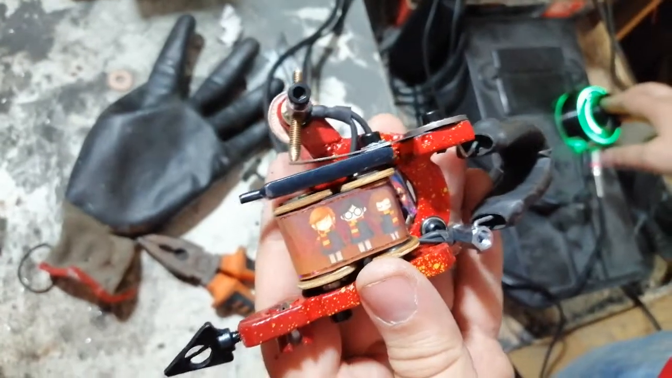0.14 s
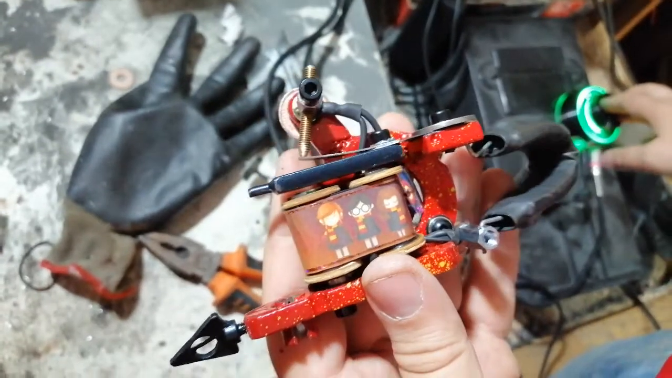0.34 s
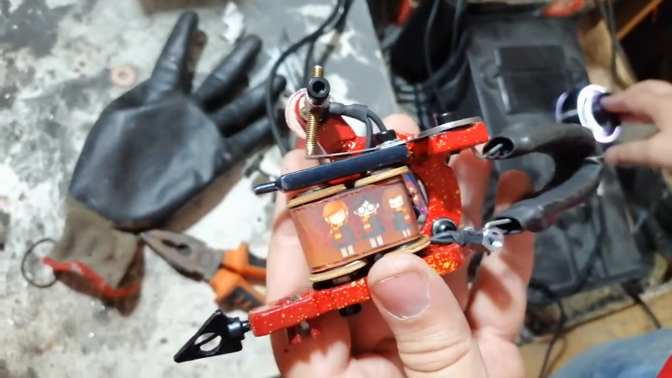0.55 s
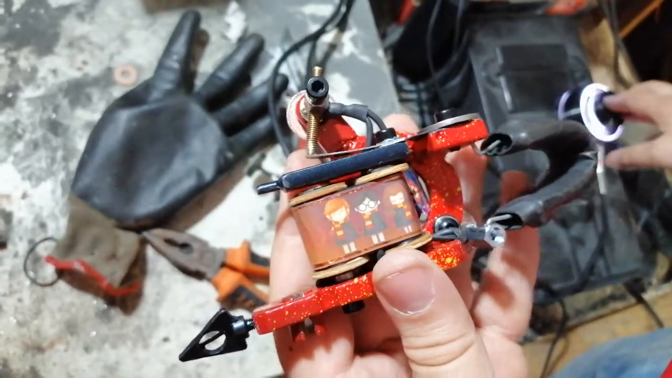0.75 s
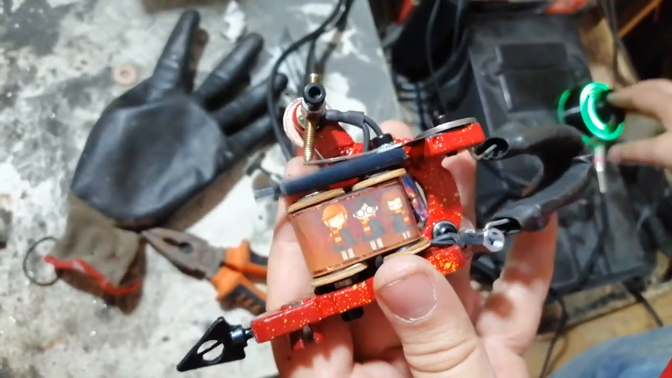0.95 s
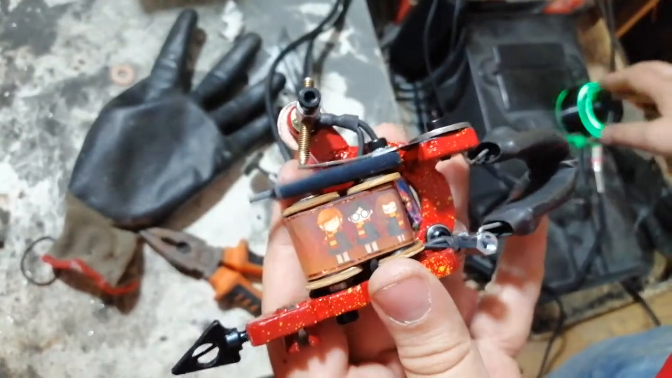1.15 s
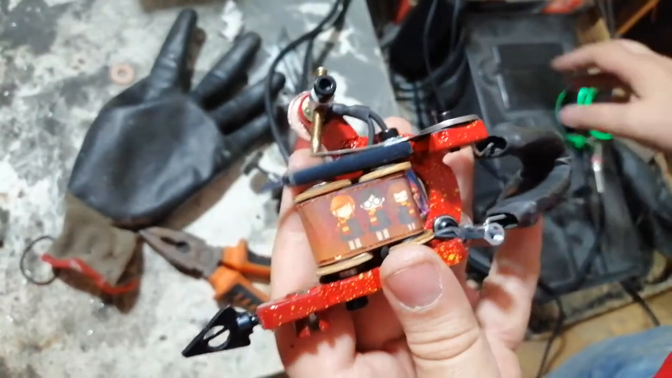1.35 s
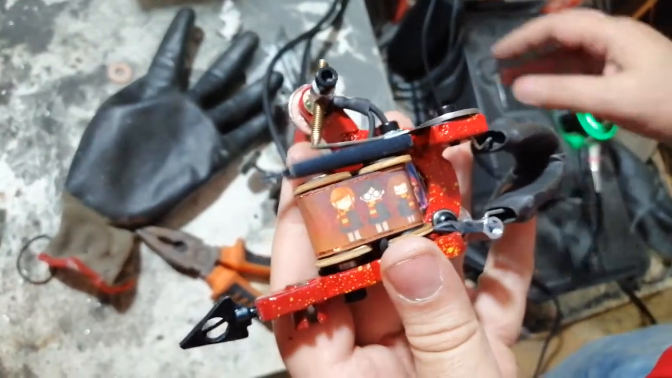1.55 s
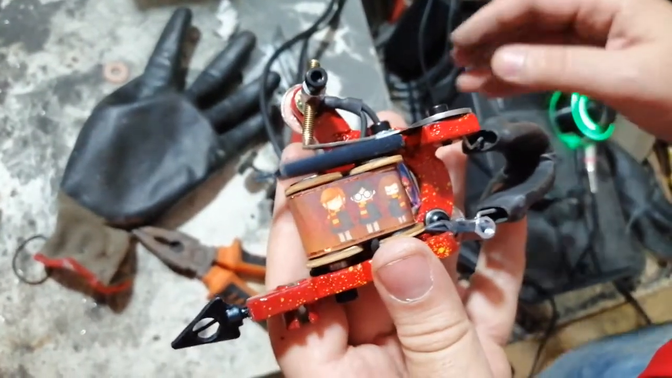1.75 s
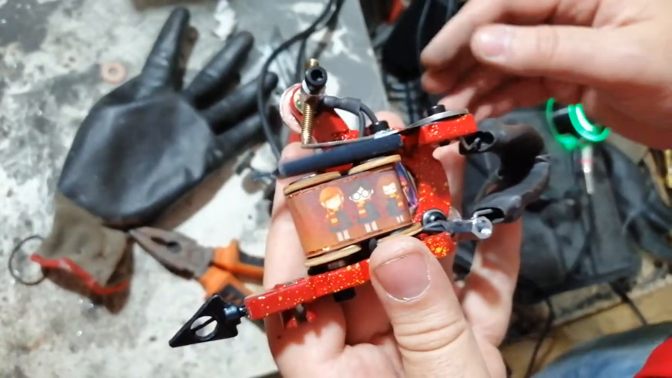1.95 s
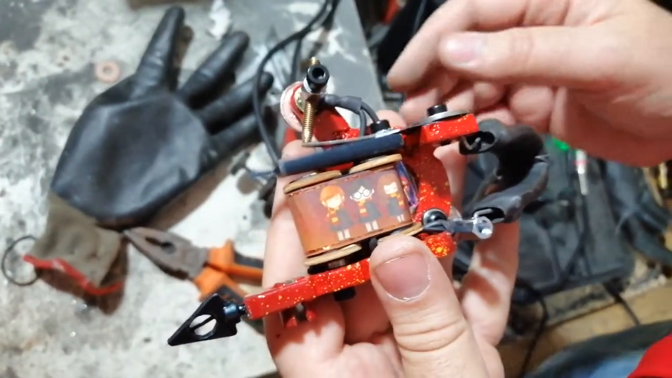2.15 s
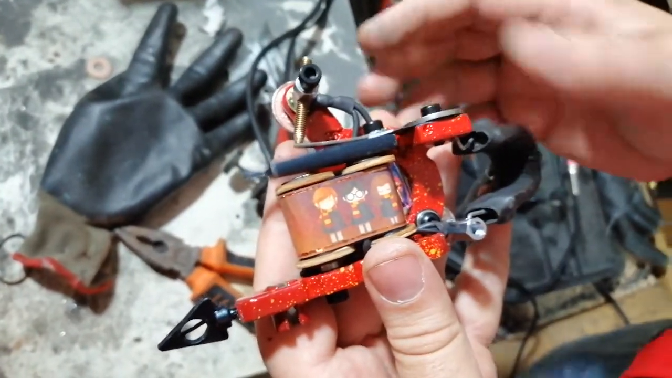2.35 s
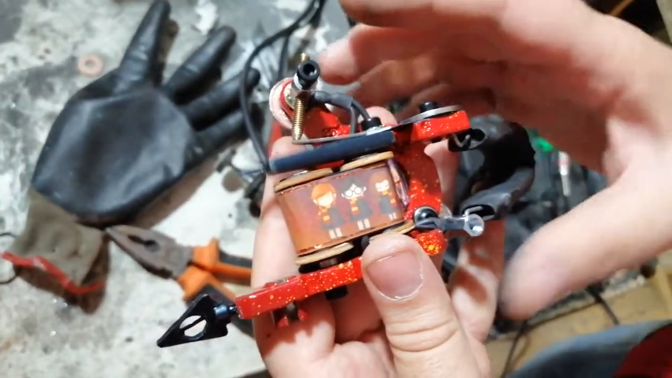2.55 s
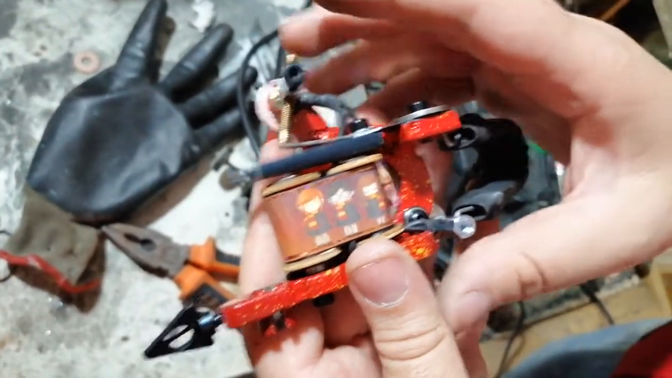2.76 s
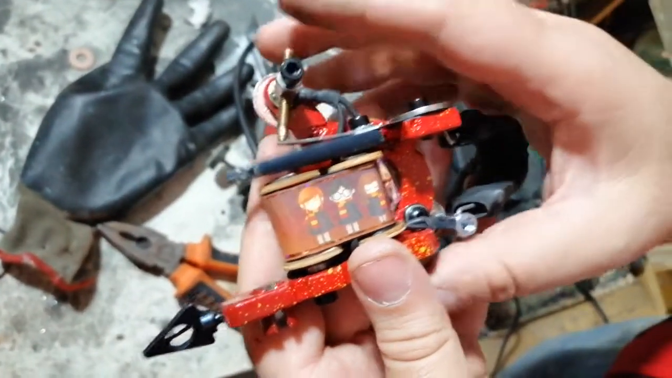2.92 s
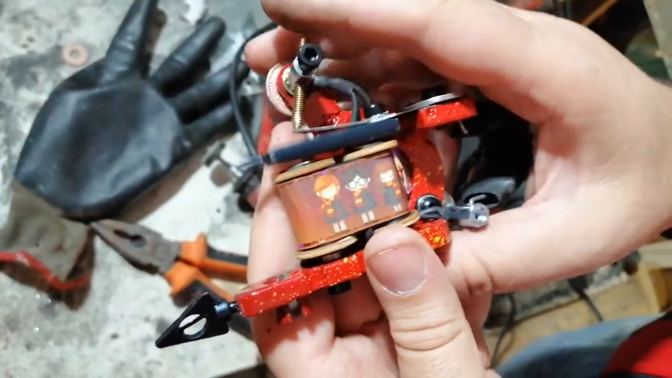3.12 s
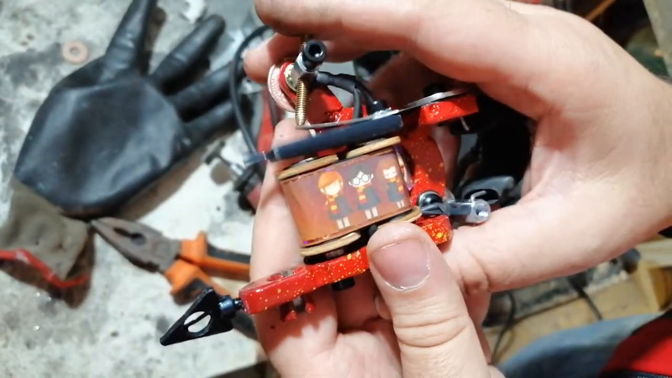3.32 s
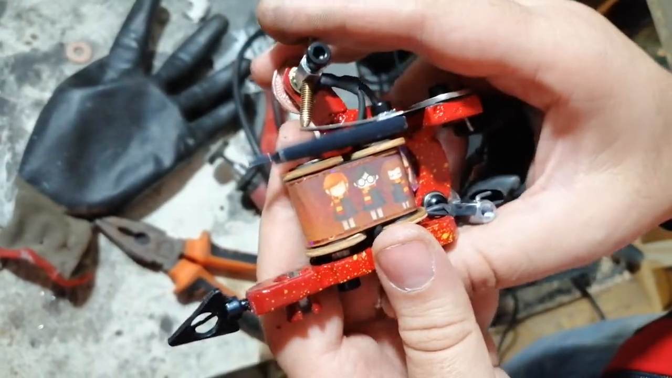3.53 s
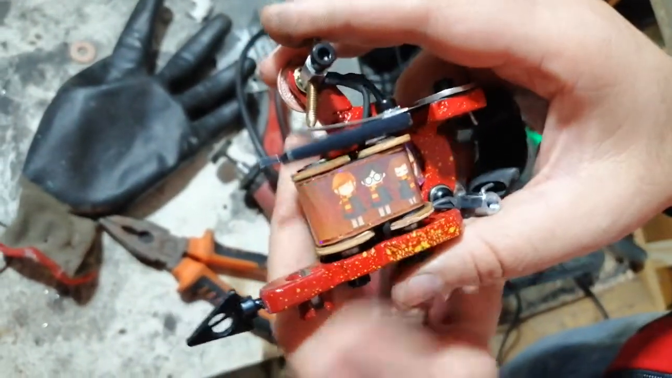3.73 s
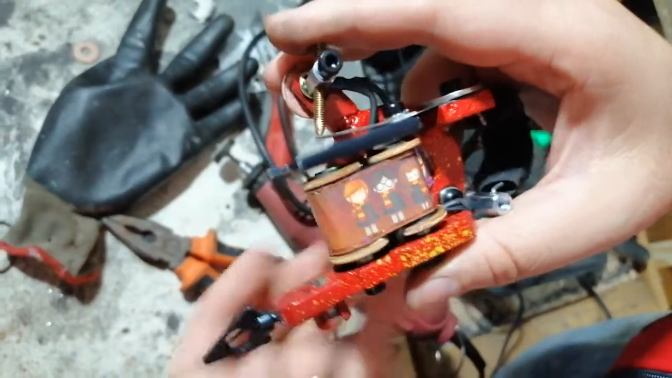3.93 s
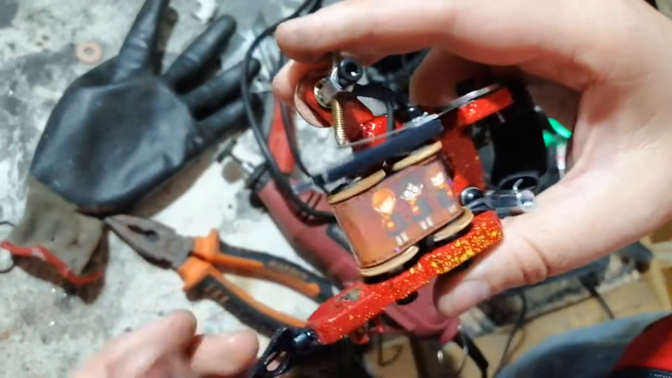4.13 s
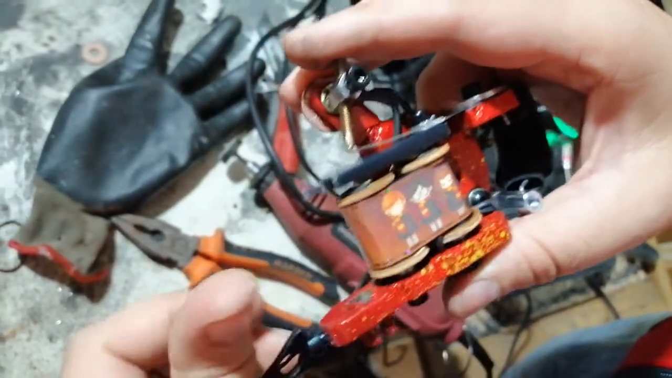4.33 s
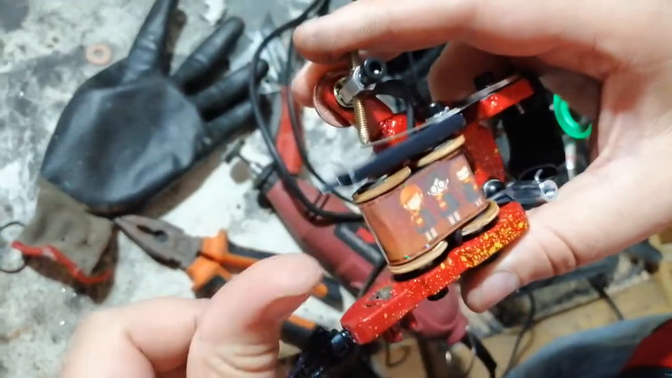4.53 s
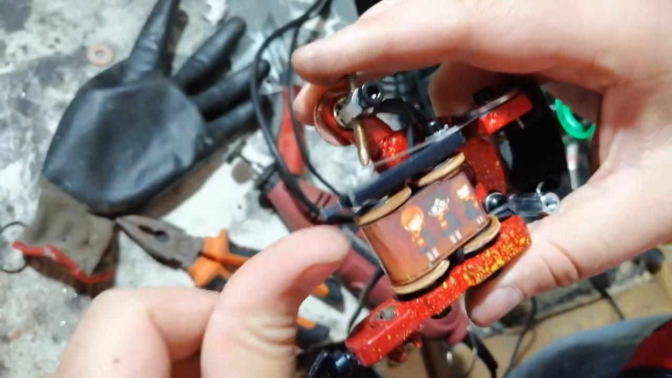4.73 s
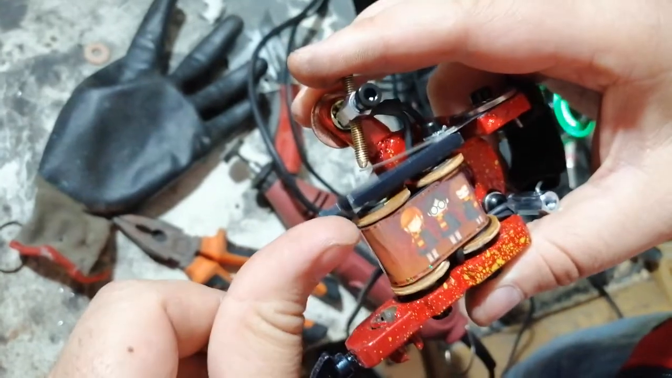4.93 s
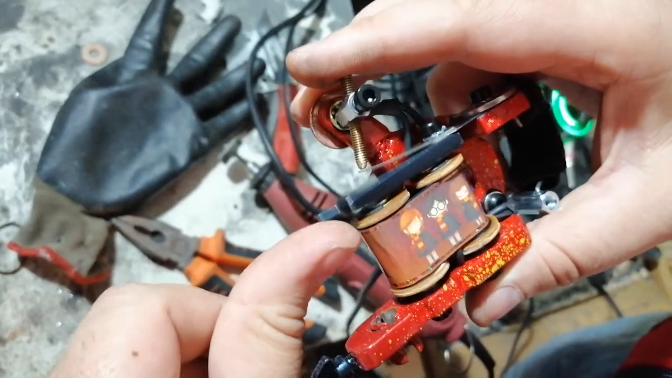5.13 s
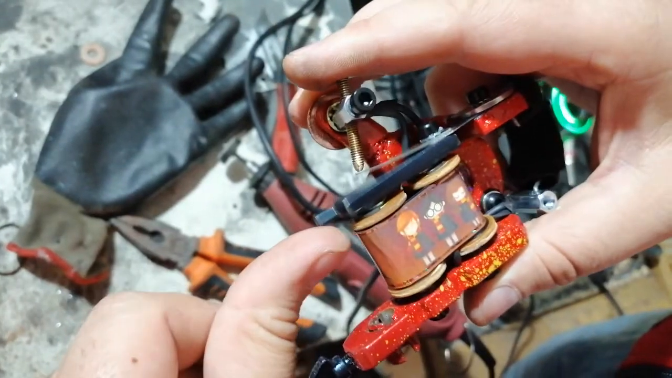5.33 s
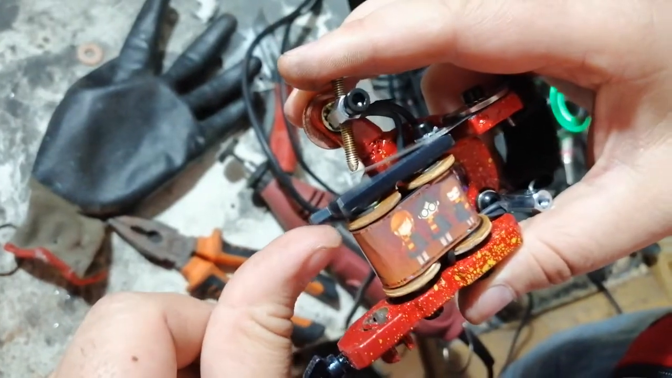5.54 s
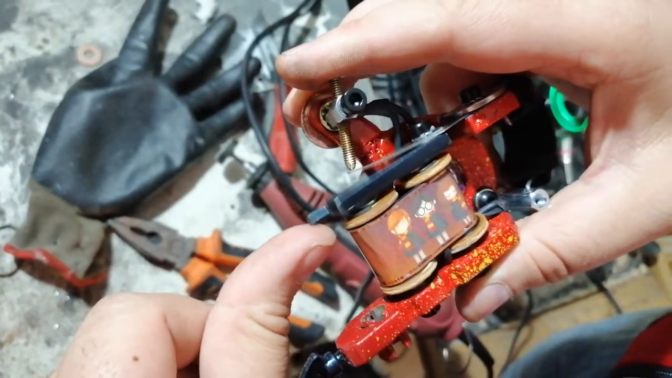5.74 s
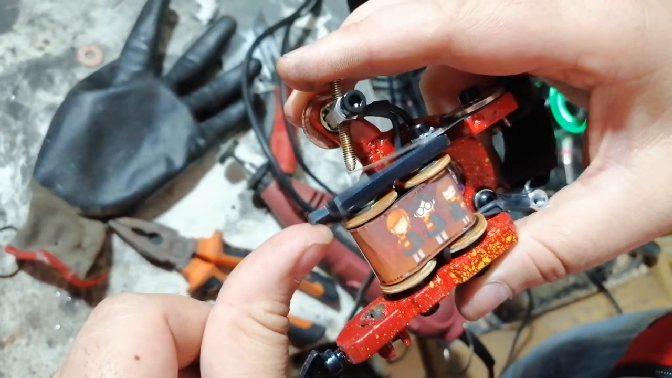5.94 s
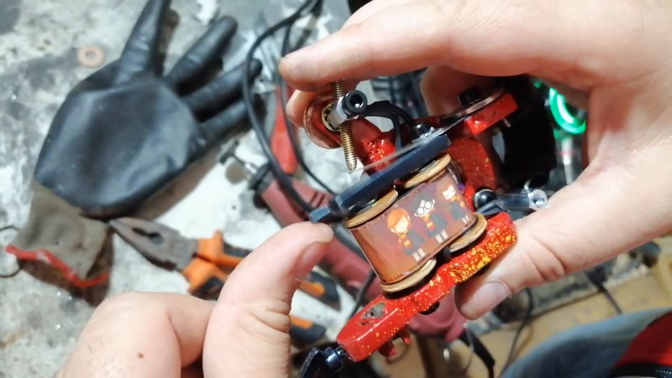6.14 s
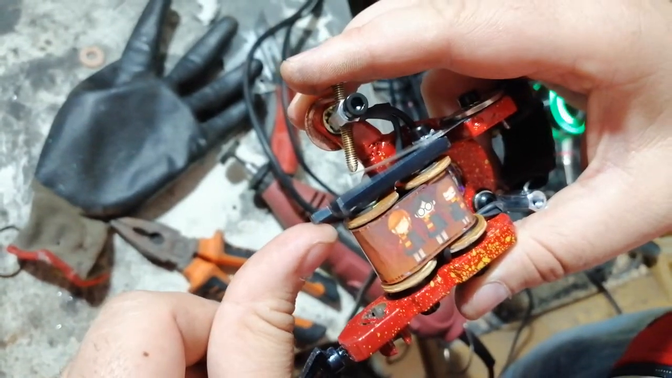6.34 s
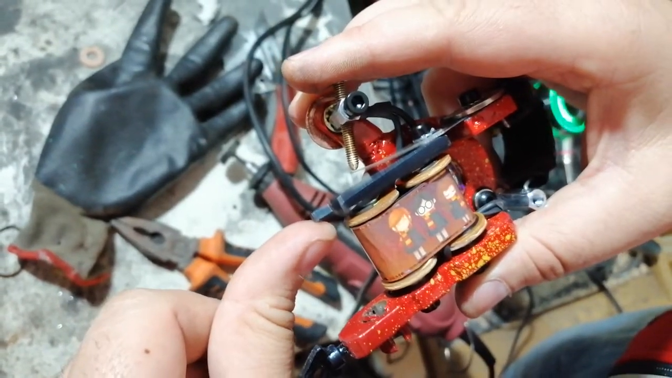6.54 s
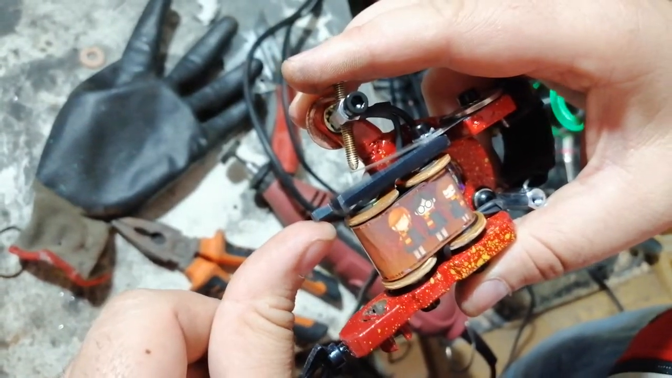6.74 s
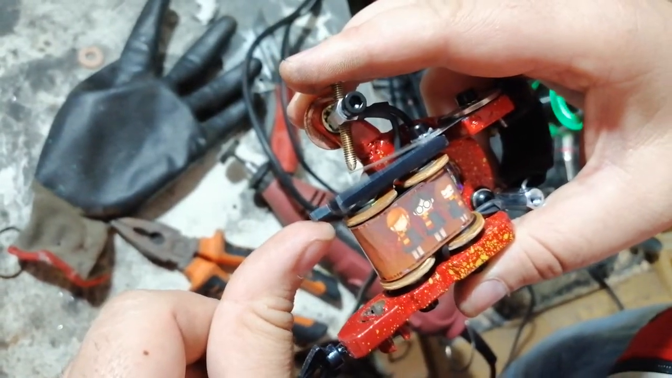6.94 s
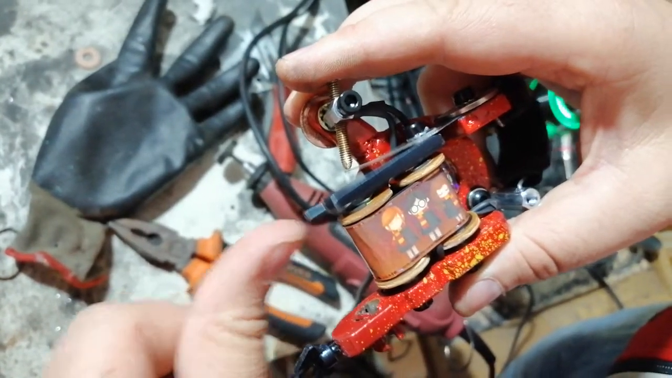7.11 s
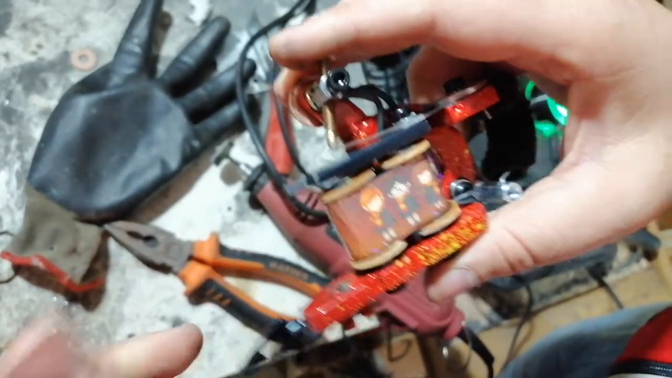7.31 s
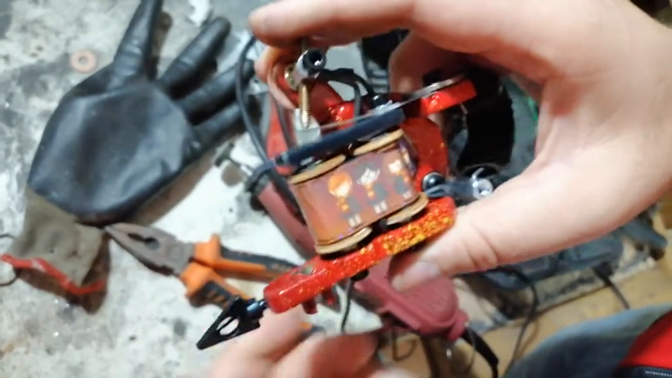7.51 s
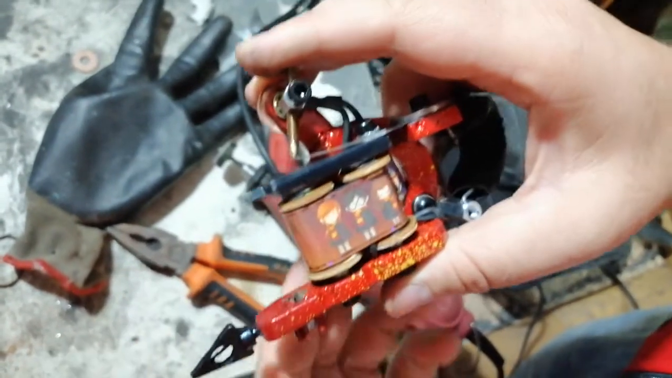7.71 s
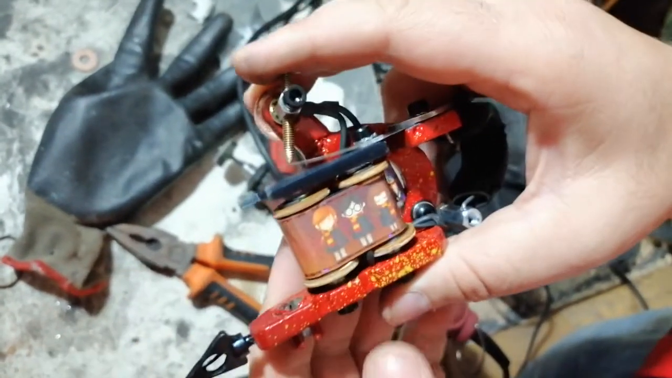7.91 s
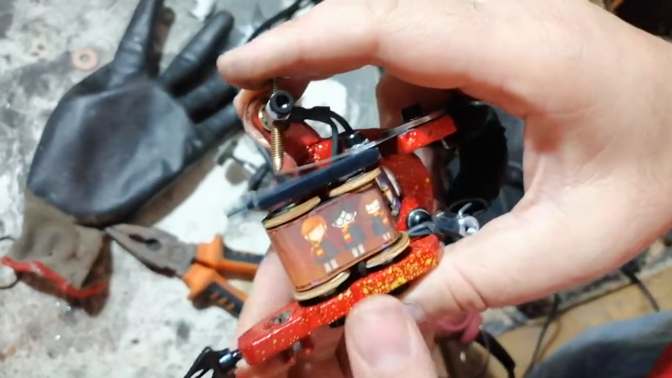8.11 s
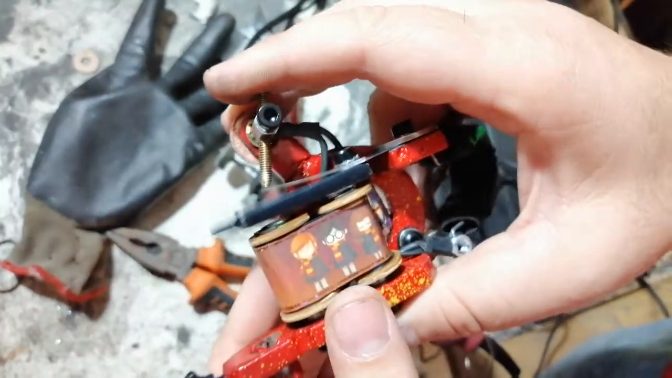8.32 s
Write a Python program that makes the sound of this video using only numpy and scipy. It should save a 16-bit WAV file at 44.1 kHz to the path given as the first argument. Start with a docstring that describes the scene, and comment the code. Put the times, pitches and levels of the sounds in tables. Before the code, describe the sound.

Quiet workshop air with a faint low rumble opens the scene. Light knocks on a plastic box come at about 0.2 and 0.5 seconds, then a firmer clack at 0.8 with a small crackle after it. Just before 1.0 a coil tattoo machine switches on suddenly, very close: a loud, dry, bright buzz of steel blows and spring ticks about 120 times a second, over a weak hum. It begins a little faster and settles by 1.3. It runs evenly to about 3.6, its metallic timbre changing as the hand moves, with slight dips near 4 and more weight to the left later. From 5.5 to 7.2 a thumb presses the bar: pitch sags repeatedly, strokes soften and become rough, with brief near-stalls around 6.4 and 7.2. At 7.25 it jumps back to speed and buzzes steadily, still running at the end, about 8.5.

```python
"""Coil tattoo machine, hand-held and close

In a quiet workshop a coil tattoo machine is switched on close to a phone with two microphone ports.
Each cycle the armature bar slams the coil core and the spring ticks the contact screw: impulses ring
the modes of steel frame, spring and coils, over a hum at the stroke rate. The hand turns the machine,
and a thumb on the bar slows it and makes it stumble. Knocks on the supply box come before the start."""
import sys
import numpy as np
from scipy import signal
from scipy.fft import rfft, irfft
from scipy.io import wavfile
from scipy.ndimage import uniform_filter1d

SR = 44100
rng = np.random.default_rng(int(sys.argv[2]) if len(sys.argv) > 2 else 0)


def int16_out(signal):
    """Quantize to a 16-bit WAV file."""
    q = np.round(np.clip(np.atleast_2d(signal).T, -1, 1) * 32767)
    wavfile.write(sys.argv[1], SR, q.astype(np.int16))


N = 373527

# the first strokes build up: (time [s], level [dB])
SWITCH_ON = [(0.962, -55.5), (0.967, -21), (0.973, -16), (0.982, 1.5)]


def undb(db):
    """Amplitude gain for a level in dB."""
    return 10 ** (np.asarray(db) / 20)


def level(x, db):
    """Scale to an overall RMS level in dB."""
    return x * undb(db) / np.sqrt(np.mean(x ** 2))


def band(x, low_hz, high_hz):
    """Gentle band-pass."""
    return signal.sosfilt(signal.butter(2, [low_hz, high_hz], "band", fs=SR, output="sos"), x)


def mode(x, hz, t60):
    """Complex ringing of one mode, gain 1 at its centre, falling 60 dB in t60 seconds."""
    r = np.exp(-np.log(1000) / (t60 * SR))
    return signal.lfilter([1 - r], [1, -r * np.exp(2j * np.pi * hz / SR)], x)


def struck(x, hz, t60):
    """One mode scaled so that its ring starts about as high as the click that strikes it."""
    return np.imag(mode(x, hz, t60)) * t60 * SR / np.log(1000)


def clicks(at_s, size):
    """Windowed-sinc clicks placed between samples."""
    out, taps = np.zeros(N + 64), np.arange(-8, 9)
    at = np.clip(at_s * SR, 8, N)
    whole = at.astype(int)
    d = taps - (at - whole)[:, None]
    shape = np.sinc(d) * np.cos(np.pi * d / 18) ** 2
    np.add.at(out, whole[:, None] + taps, size[:, None] * shape)
    return out[:N]


def walk(rate):
    """Random levels held 1 / rate seconds and slewed twice; spread near 1."""
    k = int(SR / rate)
    held = np.repeat(rng.standard_normal(N // k + 1), k)
    return 2.02 * uniform_filter1d(uniform_filter1d(held, k), k)[:N]


def fade(x, tau_s):
    """Each click becomes an exponentially dying envelope."""
    return signal.lfilter([1], [1, -np.exp(-1 / (tau_s * SR))], x)


def posed(db, pose):
    """Left and right gains for the way the machine is held, wavering with the hand."""
    return undb([np.interp(pose, [0, 1, 2], db[ch::2]) + 1.2 * walk(3) for ch in range(2)])


def strokes(t, hz, tick_db):
    """Click trains of core blows and contact ticks; thumb load makes them uneven."""
    free_hz, stall_hz = 121, 110  # stroke rates at no load and full load
    tick_lag_s = 0.0029
    cycle = np.cumsum(hz * (t > SWITCH_ON[0][0])) / SR
    at = np.interp(np.arange(int(cycle[-1])) + .62, cycle, t)
    load = np.clip((free_hz - np.interp(at, t, hz)) / (free_hz - stall_hz), 0, 1)
    chance = np.clip(rng.standard_normal((len(at), 4)).T, -2, 2)
    at = at + (4e-6 + 1e-4 * load ** 2) * chance[0]
    blow = clicks(at, undb((.5 + 1.5 * load ** 2) * chance[1]))
    tick_size = undb(np.interp(at, t, tick_db) + (1.2 + 2 * load ** 2) * chance[3])
    tick = clicks(at + tick_lag_s + 1.2e-5 * chance[2], tick_size)
    return blow, tick, cycle


def stalls(t):
    """Gain in dB: a hard-pressing thumb stops the bar short of the core and weakens the strokes."""
    # the moments of hardest pressing: (time [s], length [s], level [dB])
    presses = [(6.385, 0.017, -4), (7.163, 0.029, -11), (7.198, 0.015, -10)]
    return sum(db * np.exp(-(2 * (t - s) / length) ** 4) for s, length, db in presses)


def frame(blow, tick, pose, shift):
    """Every steel mode rings from both contacts, their chatter and the rattle that trails each blow."""
    # frame, bar and spring modes: (frequency [Hz], t60 [s], then relative levels [dB]:
    # flat left, flat right, tilted left, tilted right, turned back left, turned back right)
    steel_modes = [(2098, 0.012, -11.5, -14.5, -5.5, -18, -11, -2),
                   (2583, 0.013, -6.5, -13.5, -12.5, -10, -17, -5.5),
                   (2865, 0.0036, -12, -12, -13.5, -10.5, -21, -4),
                   (3504, 0.036, 1, -38, -8, -32, -4.5, -17), (3752, 0.027, -6, -4, -2.5, -11, -6.5, -6),
                   (3960, 0.011, -1.5, -19, -8.5, -37, -17, -29), (4590, 0.021, 3, -10, -5, -4, -1.5, -2),
                   (5160, 0.0067, 1.5, -8, -7, -2, -14, -3.5),
                   (5360, 0.0047, -37, -11, -8, -5.5, -8.5, -19),
                   (6090, 0.0074, -7, -29, -10, -47, -11.5, -8), (6490, 0.0099, -2, -5, -10, -31, 1.5, -8),
                   (7350, 0.0061, -13, 2, -14, -3.5, -24, 6), (7670, 0.011, -12, 4.5, -2, -46, -5, -32),
                   (8120, 0.0027, -14, -5, -1.5, 1, 3.5, -3), (8366, 0.0076, -30, -7, -2, 0.5, 3.5, 5.5),
                   (8890, 0.0024, -15, -1.5, -5.5, -4, -33, 1.5),
                   (9850, 0.0038, 7, -38, -31, -10, -6, -9.5), (10420, 0.0047, -27, -16, 7.5, -3, -5.5, -4),
                   (10370, 0.0069, -11, 4, 10, -17, 0, -24), (11120, 0.0038, -11, -8.5, -1, -12, -10, 2.5),
                   (11050, 0.0075, -29, -40, 5.5, -16, -25, 8), (11964, 0.006, 0, -36, 1.5, -26, -3.5, -48),
                   (12060, 0.002, -2, -18, -2, -35, -9.5, -49), (13800, 0.006, -26, -24, -5, -16, -14, -37),
                   (13500, 0.0058, -11, -37, -18, -9, -8, -46),
                   (15000, 0.012, -21, -26, -23, -28, -60, -20)]
    spring_hz = 3700
    chatter_tilt = 1.3  # chatter grows with pitch
    rattle = undb(-22.5) * fade(blow + tick, 0.0012) + undb(-25.5) * fade(blow, 0.005) + undb(-34.0)
    chatter = rng.standard_normal((2, N)) * rattle
    # loose parts rebound alike from stroke to stroke, in a pattern that drifts with the grip
    pattern = rng.standard_normal((3, 2, 400)) * np.exp(-np.arange(400) / (0.003 * SR))
    rebounds = undb(-29) * sum(walk(1.506) * signal.fftconvolve(blow[None], p)[:, :N] for p in pattern)
    rings = 0
    for k, (hz, t60, *db) in enumerate(steel_modes):
        # the tick lands on the spring: its modes take it harder, the lowest and highest ones less
        if abs(hz - spring_hz) < 400:
            spring = undb(5)
        else:
            spring = min((hz / spring_hz) ** 2, 1, (10500 / hz) ** 4)
        # the fingers bend each mode a little, the upper ones together
        bend = (hz > 6800) * shift / 100 + .002 * walk(2)
        turn = np.exp(2j * np.pi * np.cumsum(hz * bend) / SR)
        drive = blow + spring * tick + (hz / 9000) ** chatter_tilt * (chatter + rebounds)
        ring = turn * mode(drive / turn, hz, t60)
        # neighbouring modes swing in opposite senses
        rings = rings + (-1) ** k * posed(db, pose) * np.imag(ring)
    left, right = level(level(rings, 0) + crack(blow, tick, pose), 0)
    port_lag = 20  # samples by which the left port hears the steel first
    return np.array([left, np.roll(right, port_lag)])


def crack(blow, tick, pose):
    """Bare crack of steel on steel: short doubled resonances of the hits alone."""
    # crack modes: (frequency [Hz], t60 of each resonance [s], then relative levels [dB]:
    # flat left, flat right, tilted left, tilted right, turned back left, turned back right)
    crack_modes = [(7864, 0.0014, -7, -14.5, -3.5, -1.5, -16.5, -3.5),
                   (10070, 0.0012, -24, -2.5, -13, 1, -23, 5),
                   (13580, 0.0021, -6.5, -30, -10, -30, -9.5, -30),
                   (3146, 0.0027, -22, -30, -22.5, -23, -25.5, -25),
                   (5670, 0.0012, -14, -22, -20, -16, -22.5, -21),
                   (11360, 0.0022, -9, -16, -10.5, -32, -17, -27)]
    bounce_lag = 24  # samples from blow to rebound of the bar
    hits = blow + .22 * tick
    # the rebound of the bar faces the left port
    hits = np.array([hits + 0.83 * np.roll(blow, bounce_lag), hits])
    out = 0
    for hz, t60, *db in crack_modes:
        ring = np.imag(mode(mode(hits, hz, t60), hz, t60))
        out = out + posed(db, pose) * level(ring, 0)
    return out


def sing(tick, db):
    """Driven through the contact, the spring swells before it dies; mostly heard left."""
    hz, t60 = 11220, 0.0055  # Hz, s for each of two chained resonances
    note = np.imag(mode(mode(tick, hz, t60), hz, t60))
    return level(note, 0) * undb(db + np.array([[0], [-11]]))


def swing(blow, tick):
    """The jerk of the bar pushes air toward one port and away from the other; coils and grip ring along."""
    # low modes of coils and grip: (frequency [Hz], t60 [s], left level [dB], right level [dB])
    coil_modes = [(654, 0.036, -23, -16.5), (954, 0.019, -12, -5.5), (1230, 0.0056, -8, -6),
                  (1364, 0.0083, -7, -6), (1840, 0.0015, -48, -16)]
    push = band(blow + 0.41 * tick, 150, 900)
    shove = band(blow + 0.46 * tick, 150, 600)
    air = band(rng.standard_normal((2, N)), 100, 2500)
    coils = 0
    for k, (hz, t60, left, right) in enumerate(coil_modes):
        ring = level(np.imag(mode(blow, hz, t60)), 0)
        coils = coils + (-1) ** k * ring * undb([[left], [right]])
    return np.array([-level(shove, 0), level(push, 0)]) + coils + level(air, -20)


def shake(cycle, db):
    """The whole machine shakes once a stroke, with an octave; the ports hear it far out of step."""
    octave_db = -6.5
    low = np.sin(2 * np.pi * cycle + np.array([[.3], [2.5]]))
    octave = np.sin(2 * 2 * np.pi * cycle + np.array([[.3], [2.8]]))
    return (low + undb(octave_db) * octave) * undb(db + np.array([[3.5], [0]]))


def jolt():
    """The coils grab the bar at switch-on and jolt the grip: one low thump."""
    # the thump: (time [s], level [dB], frequency [Hz], t60 [s])
    s, db, hz, t60 = (0.982, -46, 70, .04)
    return struck(clicks(np.array([s]), undb([db])), hz, t60)


def grip():
    """Fingers shift on the frame: short dull scuffs of skin on steel smear the low buzz."""
    # finger shifts: (time [s], relative level [dB])
    shifts = [(2.689, -65), (3.429, -67.5), (3.881, -69), (4.12, -67), (4.51, -66.5), (4.74, -64.5),
              (5.16, -72), (5.39, -73)]
    s, db = np.transpose(shifts)
    swell = uniform_filter1d(fade(clicks(s, undb(db)), 0.048), SR // 100)
    scuff = band(rng.standard_normal((2, N)), 150, 1800)
    return swell * level(scuff, 9.7)


def knocks():
    """Fingers knock the plastic supply box: a dull ring, a thud, a noisy crack and a rustling tail."""
    # knocks on the box: (time [s], hit level [dB], left minus right [dB], treble relative to hit [dB],
    # thud relative to hit [dB], treble frequency [Hz])
    box_knocks = [(0.236, -65, -9, -18, -3, 3000), (0.542, -64, -5, 2, 2, 10300),
                  (0.821, -44.5, 0, -6, -26, 5000), (0.884, -62, -2, 7, -13, 4500)]
    # modes of the box: (frequency [Hz], relative level [dB], t60 [s])
    box_modes = [(295, -23, 0.05), (423, -1, 0.045), (570, -9, 0.066), (760, -7, 0.025), (1090, 2.5, 0.012),
                 (1330, -4, 0.01), (1930, -7, 0.018)]
    thud_hz, thud_t60_s = 125, 0.11
    s, db, pan_db, treble_db, thud_db, treble_hz = np.transpose(box_knocks)
    out = []
    for side in (1, -1):
        hit = clicks(s, undb(db + side * pan_db / 2))
        hit = hit + 0.056 * fade(hit, 0.036) * rng.standard_normal(N)
        body = sum(undb(g) * struck(hit, hz, t60) for hz, g, t60 in box_modes) / 3
        treble = 0
        for k, hz in enumerate(treble_hz):
            envelope = fade(clicks(s[[k]], undb(db + treble_db)[[k]]), 0.0059)
            treble = treble + np.real(mode(envelope * rng.standard_normal(N), hz, 8 / hz))
        thud = struck(clicks(s, undb(db + thud_db)), thud_hz, thud_t60_s)
        out.append(body + thud + treble)
    return np.array(out)


def shop():
    """Still air of the workshop: shaped noise, its bass shared more by both ports and swelling a little."""
    # spectrum of the room air: (frequency [Hz], relative level per Hz [dB])
    air_spectrum = [(12, -38), (20, -10.5), (59, -4.5), (207, -20.5), (289, -20.5), (342, -18),
                    (416, -23.5), (2760, -33), (3000, -32), (3540, -33.5), (15500, -51)]
    shop_db = -73.5
    f = np.maximum(np.arange(N // 2 + 1) * SR / N, 1)
    at_hz, at_db = np.transpose(air_spectrum)
    shape = undb(np.interp(np.log(f), np.log(at_hz), at_db))
    mid, side = rfft(rng.standard_normal((2, N))) * shape
    apart = np.clip(f / 1200, .45, 1)
    air = mid + apart * side * np.array([[1], [-1]])
    bass = irfft(air * (f < 300), N) * undb(2 * walk(6))
    return level(bass + irfft(air * (f >= 300), N), shop_db)


def scene():
    """Stroke rate and hold drive the machine's layers; grip, box and room stand beside them."""
    # the bar starts fast and settles; the thumb leans on it and lets go: (time [s], stroke rate [Hz])
    stroke_rate = [(0.98, 134.2), (1.04, 136.1), (1.21, 122.6), (1.4, 122.7), (1.55, 120.8), (2.41, 120.7),
                   (3.59, 120.8), (3.84, 119.4), (4.08, 119.2), (4.18, 121.1), (4.58, 120.5), (4.76, 121),
                   (5.14, 120.1), (5.18, 121.4), (5.39, 120.5), (5.5, 118.5), (5.54, 122), (5.7, 117.9),
                   (5.78, 113), (5.82, 113.4), (5.86, 118.1), (5.97, 118.7), (6.03, 115), (6.07, 118.5),
                   (6.19, 114.8), (6.23, 117.9), (6.34, 117.2), (6.38, 110.8), (6.44, 109.8), (6.49, 113),
                   (6.55, 113.2), (6.59, 117.3), (6.92, 118), (6.99, 113.4), (7.03, 113), (7.09, 117.2),
                   (7.15, 108.3), (7.2, 108), (7.24, 120.5), (7.26, 121.4), (7.47, 120.2), (8.01, 121.6),
                   (8.45, 118.6), (8.47, 121)]
    # how the hand shows the machine to the phone, levels before the slowing terms below: (time [s],
    # ring [dB], bar swing minus ring [dB], ring left minus right [dB], swing left minus right [dB],
    # hum [dB], contact tick [dB])
    hold = [(0.98, -40, -17, -5.5, -4, -57, -10), (1.075, -39.5, -13.5, -5, -8.5, -66, -2),
            (1.1, -40.5, -20.5, -2.5, -2, -64, -4), (1.3, -39, -19, -4, -8, -59.5, -1.5),
            (1.6, -39.5, -17, -1, -6, -58.5, -1.5), (2.6, -38, -18.5, -1, -5.5, -56, -4),
            (2.78, -37, -18, -1.5, -1.5, -55, -12), (3.55, -38, -22, 2, 5.5, -55.5, -3),
            (3.85, -40, -15.5, 1.5, 1, -56, -3.5), (4.75, -39.5, -18.5, 6, 6, -56.5, -4),
            (5.1, -40, -18, 6, 0.5, -55.5, -1.5), (6.0, -38.5, -22.5, 6, 6.5, -56.5, -2.5),
            (7.0, -39, -21, 3.5, 2.5, -59, -4), (7.45, -39.5, -15, 6.5, 0.5, -56, -5),
            (7.899, -38, -21.5, 5.5, -3.5, -59.5, -11), (8.47, -39, -18, 4, 4, -52, -4)]
    # how the hand holds it: (time [s], pose [0 flat, 1 tilted, 2 turned back], upper mode shift [%])
    hand_pose = [(1.0, 0.5, 0.5), (2.0, 0.12, 1), (3.0, 0.3, 2.5), (3.7, 0.43, -0.6), (4.0, 1.1, 0.5),
                 (4.6, 1.18, 0), (5.3, 1.58, 0), (6.2, 1.2, 0.5), (7.15, 1.0, 1), (7.3, 1.36, 1),
                 (7.7, 2, 0.3), (8.0, 2.2, -2.5), (8.4, 2.5, 0.3)]
    # how loudly the spring sings: strong at the start, fading, rising again under the thumb:
    # (time [s], level [dB])
    spring_song = [(1.0, -5), (4.7, -20), (5.2, -12), (5.6, -8.5), (6.4, -6), (7.15, -8), (7.25, -6),
                   (8.4, -15)]
    t = np.arange(N) / SR
    hz = np.interp(t, *np.transpose(stroke_rate))
    slowed = np.maximum(120.53 - hz, 0)  # Hz below the free stroke rate
    s, *columns = np.transpose(hold)
    ring_db, swing_db, ring_pan, swing_pan, hum_db, tick_db = (np.interp(t, s, c) for c in columns)
    # dB per Hz: a slowed bar hits softer, swings and shakes less, and the contact stands out
    ring_db = ring_db - 0.78 * slowed
    swing_db = swing_db - 0.69 * slowed
    tick_db = tick_db + 0.79 * slowed
    hum_db = hum_db - 2 * slowed + 1.17 * walk(4.9)  # the hum also wavers
    blow, tick, cycle = strokes(t, hz, tick_db)
    weakened = undb(stalls(t))
    blow, tick = blow * weakened, tick * weakened
    s, pose, shift = np.transpose(hand_pose)
    steel = frame(blow, tick, np.interp(t, s, pose), np.interp(t, s, shift))
    steel = steel + sing(tick, np.interp(t, *np.transpose(spring_song)))
    sides = np.array([[.5], [-.5]])
    ring = steel * undb(ring_db + sides * ring_pan)
    bar = swing(blow, tick) * undb(ring_db + swing_db + sides * swing_pan)
    hum = shake(cycle, hum_db)
    on = undb(np.interp(t, *np.transpose(SWITCH_ON), left=-120))
    return on * (ring + bar + hum) + jolt() + grip() + knocks() + shop()


def record(dry):
    """The phone turns its deepest bass down while the sound is loud, and cuts the top; right is duller."""
    right_port_hz, top_hz = 14140, 15600
    duck_hz, duck_db, loud_db = 89.5, -12, -51  # bass limit, deepest cut, level that brings it
    right = signal.sosfilt(signal.butter(N=6, Wn=right_port_hz, fs=SR, output="sos"), dry[1])
    dry = np.array([dry[0], right])
    loud = np.sqrt(np.abs(uniform_filter1d(np.mean(dry ** 2, axis=0), SR // 20)))
    duck = 1 - undb(duck_db * np.clip(loud / undb(loud_db), 0, 1))
    deep = signal.sosfiltfilt(signal.butter(4, duck_hz, fs=SR, output="sos"), dry)
    return signal.sosfilt(signal.ellip(10, .2, 80, top_hz, fs=SR, output="sos"), dry - duck * deep)


dry = scene()
out = record(dry)
int16_out(out)
```